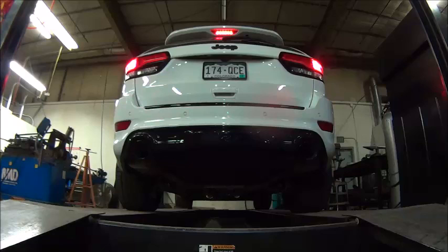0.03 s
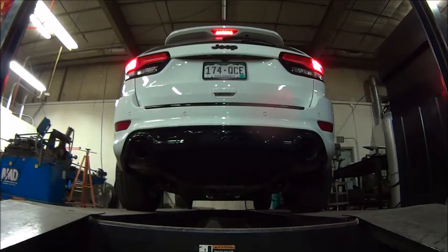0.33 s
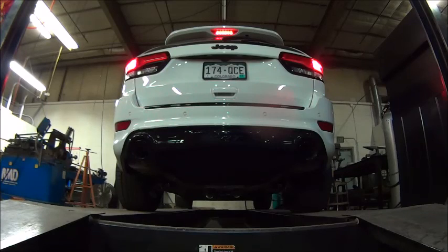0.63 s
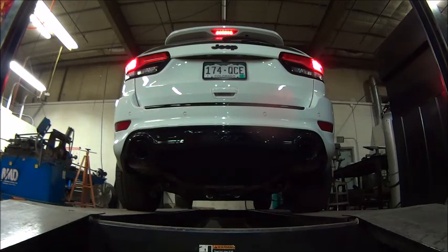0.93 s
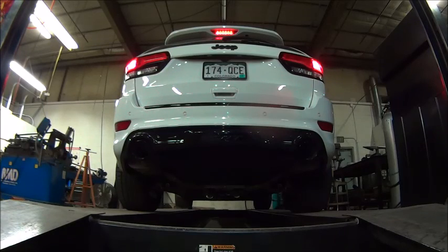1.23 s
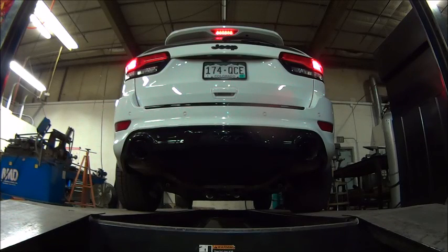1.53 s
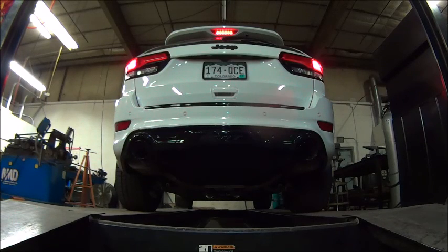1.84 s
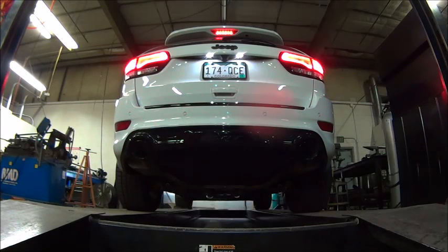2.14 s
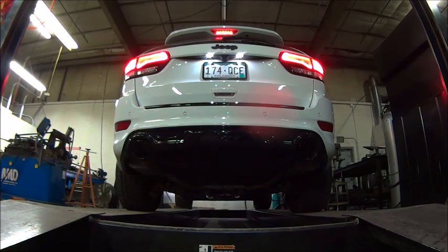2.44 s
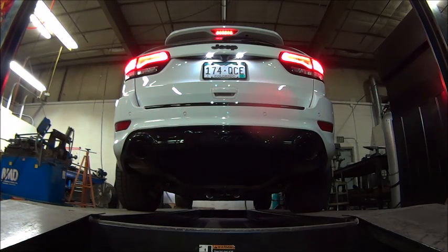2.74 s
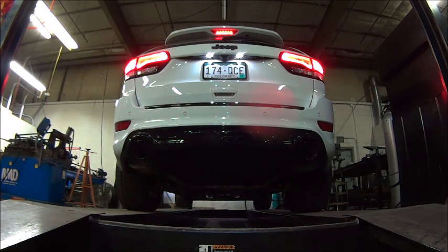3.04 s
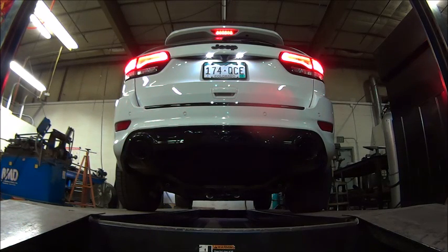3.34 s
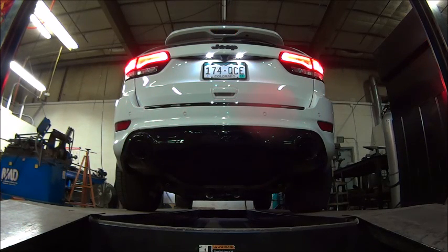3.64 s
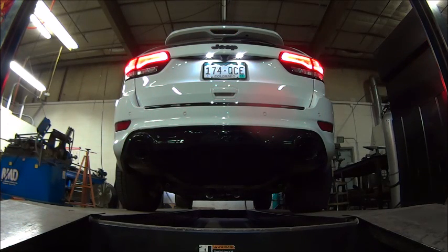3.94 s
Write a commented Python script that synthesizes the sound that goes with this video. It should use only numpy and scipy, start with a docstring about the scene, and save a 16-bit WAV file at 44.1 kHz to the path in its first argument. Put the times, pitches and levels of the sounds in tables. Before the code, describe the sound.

A car's starter grinds briefly, then the big engine fires and throbs through its exhaust.

```python
"""A V8 starts in a workshop, heard on a stereo microphone just behind its tailpipes.
First a faint whine sinks, the fuel pump hisses and a relay clacks. The starter's gear teeth grind and
squeal through a few compressions, each chuffing air from the pipes. The engine catches, flares, booms
at a fast idle and settles into a loping rumble as its unequal cylinders pulse through the exhaust.
The walls add a short tail, and the shop's machines murmur in the background."""
import sys
import numpy as np
from scipy import signal
from scipy.fft import rfft, irfft, next_fast_len
from scipy.io import wavfile
from scipy.ndimage import uniform_filter1d, minimum_filter1d, map_coordinates

SR = 44100
rng = np.random.default_rng(int(sys.argv[2]) if len(sys.argv) > 2 else 0)


def master(y):
    """Save y as 16-bit WAV."""
    cut = np.clip(np.atleast_2d(y).T, -1, 1)
    pcm = np.round(cut * 32767)  # scale
    wavfile.write(sys.argv[1], SR, pcm.astype(np.int16))


N = 176400

# engine speed (time [s], firing rate [Hz])
FIRING_RATE = [(1.79, 48.46), (1.83, 60.6), (1.87, 74.7), (1.92, 93.9), (1.97, 109), (2.03, 127.4),
               (2.1, 123.4), (2.18, 115.9), (2.29, 112.4), (2.45, 102), (2.55, 102.6), (2.7, 106.4),
               (2.87, 104.7), (3.05, 99.7), (3.25, 96.84), (3.5, 94.35), (4.0, 93)]
# cylinders in firing order; two stand out and make the throb (bank [0 or 1], strength [dB])
CYLINDERS = [(0, -3), (1, 10), (1, -2), (0, -6), (1, 8), (0, -1), (0, -5), (1, -6)]
# exhaust pulses (time [s], relative level [dB])
PULSE_LEVEL = [(1.78, -19.5), (1.86, -10), (2.0, -15.5), (2.17, -17), (2.3, -21), (2.8, -25), (3.3, -22.5),
               (4.0, -22)]
# resonances of the exhaust pipes (frequency [Hz], gain [dB])
PIPE_COLOUR = [(30, -36), (60, 4), (100, -15), (160, 5.5), (220, -4.5), (330, -5), (415, -10), (520, -18.5),
               (680, -23), (900, -33.5), (1600, -73)]
# boom at the firing rate (time [s], level [dB])
BOOM_LEVEL = [(1.775, -70), (1.797, -17), (1.87, -15), (1.96, -5.5), (2.05, -11.5), (2.14, -17),
              (2.22, -16), (2.26, -11), (2.42, -10.5), (2.6, -8.5), (2.95, -10.5), (3.15, -13),
              (3.4, -17.5), (3.7, -23), (4.0, -35)]
# lope from unequal cylinders (time [s], gain [dB])
LOPE_GAIN = [(1.78, -50), (1.85, -24), (2.2, -11), (2.45, -7), (2.75, -14.5), (3.0, -10.5), (3.25, -3.5),
             (3.55, 0), (4.0, 0)]
# strong lines of the lope (order [multiple of the engine cycle], relative level [dB])
LOPE_ORDERS = [(6, -32), (7, -37), (9, -18.5), (10, -21), (11, -44.5), (14, -27), (16, -19), (24, -30),
               (26, -39), (32, -39.5), (40, -41.5)]
# strong lines of the open-throttle bark (order [multiple of the engine cycle], level [dB])
BARK_ORDERS = [(5, -22), (16, -23), (17, -28), (20, -24), (21, -22.5), (22, -31.5), (24, -36), (29, -30.5),
               (33, -47), (40, -42), (42, -29)]
# ragged combustion (time [s], level [dB])
RAGGED_LEVEL = [(1.775, -66), (1.8, -30), (1.87, -10), (2.0, -13), (2.2, -20.5), (2.3, -32.5), (2.7, -32),
                (4.0, -32.5)]
# spectrum of ragged combustion (frequency [Hz], gain [dB])
RAGGED_COLOUR = [(20, -24), (70, 11), (165, -8), (325, 3), (510, -10.5), (650, -10.5), (900, -26.5),
                 (1500, -34)]
# gas hiss at the tailpipes (time [s], level [dB])
GAS_LEVEL = [(1.82, -15.5), (1.9, -25), (1.97, -25), (2.01, -29), (2.16, -30), (2.28, -35.5), (2.42, -34.5),
             (2.8, -41.5), (3.2, -41), (4.0, -41)]
# spectrum of the gas hiss (frequency [Hz], gain [dB])
GAS_COLOUR = [(470, -10), (800, -0.5), (1300, -5), (1650, -1), (2500, -3), (3050, -2.5), (4500, -8),
              (7700, -7.5), (9000, -11), (11000, -14)]
# how far the hiss comes in puffs (time [s], depth [0 to 1])
PUFF_DEPTH = [(1.82, 0.71), (1.9, 0.67), (1.97, 0.22), (2.4, 0.16)]
# upper treble of the gas hiss (time [s], level [dB])
FINE_HISS_LEVEL = [(2.9, -54), (3.3, -42), (4.0, -36.5)]
# spectrum of that treble and of the noise in the gear slap (frequency [Hz], gain [dB])
FINE_COLOUR = [(3000, -9), (5000, -4), (7700, 1), (9000, -7), (11000, -7.5)]
# compressions that load the starter (time [s], length [s], strength [dB], gear slap level [dB])
COMPRESSIONS = [(1.093, 0.12, -3, -15.5), (1.238, 0.11, -2.5, -45), (1.389, 0.079, -1, -28),
                (1.508, 0.066, 1, -23), (1.617, .058, -2.5, -21), (1.707, .048, -0.5, -21),
                (1.781, 0.023, -8.5, -21)]
# resonances of the starter housing (frequency [Hz], gain [dB])
HOUSING_COLOUR = [(150, -28), (270, 2), (350, -6.5), (420, -3.5), (600, -1.5), (740, 6.5), (1020, -1),
                  (1390, -2.5), (1650, 2.5), (2200, -3.5), (3000, -3), (6000, -63)]
# rasp of the gear teeth (frequency [Hz], gain [dB])
RASP_COLOUR = [(1100, -33), (2000, -4), (3000, -3.5), (5100, -1), (7700, -7), (8300, -11), (11000, -15.5)]
# thud of the pinion striking the starter housing (frequency [Hz], gain [dB])
THUD_COLOUR = [(170, -40), (430, -7), (1300, -35)]
# starter and flywheel modes (frequency [Hz], relative level [dB], time of the swell [s])
FLYWHEEL_MODES = [(398, -42, 1.13), (544, -34, 1.6), (764, -39, 1.7), (1012, -32, 1.3), (1556, -37, 1.66),
                  (2116, -38, 1.56), (3548, -42, 1.2), (3996, -39, 1.33), (4231, -40, 1.46)]
# unfired air leaving the pipes (time [s], relative level [dB])
CHUFFS = [(1.127, -28.5), (1.25, -37), (1.375, -30), (1.5, -36), (1.661, -30.5)]
# spectrum of a chuff (frequency [Hz], gain [dB])
CHUFF_COLOUR = [(20, -16), (54, 2.5), (170, -14), (275, -11), (390, -27), (660, -120)]
# gear squeal, sinking under each compression (time [s], pitch [Hz], level [dB])
SQUEAL = [(1.12, 1830, -36), (1.19, 1650, -29.5), (1.225, 1750, -45), (1.255, 2160, -30),
          (1.305, 1690, -29.5), (1.38, 1590, -36), (1.41, 2200, -28), (1.48, 1970, -47), (1.53, 2230, -25),
          (1.61, 2040, -46)]
# loose metal under the car (time [s], pitch [Hz], level [dB])
RATTLES = [(2.374, 3782, -34)]
# sinking whine (time [s], pitch [Hz], level [dB])
WHINE = [(.07, 6800, -59), (.22, 6730, -60), (.32, 6470, -60), (.42, 5870, -62), (.5, 5450, -80)]
# fuel pump hiss (time [s], level [dB])
PUMP_LEVEL = [(.52, -52), (.55, -41), (.59, -41.5), (.62, -48.5), (.66, -39.5), (.72, -39.5), (.76, -43.5),
              (.85, -36.5), (1.1, -39), (1.2, -76)]
# spectrum of the fuel pump (frequency [Hz], gain [dB])
PUMP_COLOUR = [(500, -17), (1400, -15), (1730, -2.5), (2100, -11.5), (2800, -7.5), (3300, -2), (4600, -5),
               (5400, -8), (6600, -8.5), (7400, -5.5), (8300, -15), (10800, -7.5)]
# resonances of the relay (frequency [Hz], gain [dB])
RELAY_COLOUR = [(500, -33), (1250, -32), (1740, -13), (2340, -1.5), (2750, -22), (3850, -10), (5050, -23),
                (5800, -14), (6500, -27), (8500, -14.5), (9100, -27), (10000, -11), (11000, -26)]
# partials of the throttle motor (frequency [Hz], level [dB])
THROTTLE_PARTIALS = [(999, -58), (1998, -50.5)]
# murmur of the workshop's machines (frequency [Hz], gain [dB])
SHOP_COLOUR = [(25, -15), (90, -1.5), (235, -4), (330, -13.5), (600, -18.5), (1400, -24.5), (5000, -48),
               (7000, -21), (11000, -28.5)]
# reverberation of the workshop (frequency [Hz], time to fall 60 dB [s])
ROOM_T60 = [(100, 0.43), (1000, 0.26), (10000, 0.049)]
# likeness of noise on the left and right (frequency [Hz], correlation [0 to 1])
STEREO_LIKENESS = [(60, 1), (200, 1), (500, 0.76), (10000, 0.76)]
# imbalance of the microphone ports (frequency [Hz], left minus right [dB])
MIC_BALANCE = [(60, -3.5), (110, -1.5), (300, -2), (550, 1.5), (1100, -0.5), (2000, -1), (4000, -3),
               (10000, -1.5)]
# phase between the microphone ports (frequency [Hz], left lead [rad])
MIC_PHASE = [(25, 1), (100, -0.87), (260, -0.93), (800, -1.14), (2500, -0.72), (6000, -0.017)]


def exhaust():
    """The V8 at the tailpipes, close up: firing pulses over boom, lope, bark, ragged burning and gas."""
    running = clock() > FIRING_RATE[0][0] - .02
    firing_hz = curve(FIRING_RATE) * (1 + 0.0038 * wobble(14)) * running
    firings = 2 + np.cumsum(firing_hz) / SR  # catches two places into the firing order
    pulses = firing_pulses(firings)
    boom = 2 ** .5 * np.sin(2 * np.pi * firings) * amp(curve(BOOM_LEVEL) + 1.2 * wobble(26.16))
    lope = engine_orders(firings, LOPE_ORDERS) * amp(curve(LOPE_GAIN))
    throttle = ramp(1.82, 0.03) * (1 - ramp(2.07, 0.21))
    bark = engine_orders(firings, BARK_ORDERS) * throttle
    ragged = noise(RAGGED_COLOUR) * amp(curve(RAGGED_LEVEL))
    rumble = (boom + lope + bark + ragged) * ramp(1.77, .01)
    return rumble + gas_hiss(firings) + room(pulses, wet_db=-8.5)


def firing_pulses(firings, bank_lag_s=0.0019, jitter_s=.0001, scatter_db=1.1):
    """Each firing kicks the pipes into resonance; one bank arrives a little late."""
    times = beats(firings)
    bank, strength_db = np.array(CYLINDERS)[np.arange(len(times)) % len(CYLINDERS)].T
    jitter, scatter = rng.standard_normal((1024, 2))[:len(times)].T
    arrivals = times + bank * bank_lag_s + jitter_s * jitter
    kicks = train(arrivals, amp(strength_db + scatter_db * scatter) * (times > 0))
    return unit(body(kicks, PIPE_COLOUR)) * amp(curve(PULSE_LEVEL) - 3.5)


def engine_orders(firings, orders, smear_rad=1.19):
    """Wavering tones at multiples of the engine cycle, their phases smeared over the cycle."""
    cycle_phase = 2 * np.pi * firings / len(CYLINDERS)
    return sum(amp(db + 1.3 * wobble(11)) * 2 ** .5 * np.sin(k * cycle_phase + smear_rad * k ** 2)
               for k, db in orders)


def gas_hiss(firings, lag_firings=0.52):
    """Gas leaves the pipes in a puff after each firing, under a fine hiss that grows at idle."""
    depth = curve(PUFF_DEPTH)
    puffs = (1 + depth * np.cos(2 * np.pi * (firings - lag_firings))) / np.sqrt(1 + depth ** 2 / 2)
    gas = noise(GAS_COLOUR) * puffs * amp(curve(GAS_LEVEL) + 0.77 * wobble(30.16))
    fine_hiss = noise(FINE_COLOUR) * amp(curve(FINE_HISS_LEVEL))
    return (gas + fine_hiss) * ramp(1.8, 0.055)


def starter(housing_lag_s=.014, coast_db=-2, rasp_coast_db=-9):
    """The pinion thuds in; its teeth grind on housing and flywheel, harder at each compression."""
    teeth = gear_teeth(load_lag_s=2 * housing_lag_s)
    housing = unit(room(unit(body(teeth, HOUSING_COLOUR)), wet_db=-4.5) + amp(5) * noise(HOUSING_COLOUR))
    rasp = unit(room(unit(body(teeth, RASP_COLOUR)), wet_db=-3) + amp(1.5) * noise(RASP_COLOUR))
    metal = amp(-21) * housing + amp(1) * flywheel()
    # the coast levels keep the grind going between compressions
    grind = metal * np.hypot(amp(coast_db), compression_load(housing_lag_s))
    grind += amp(-19) * rasp * np.hypot(amp(rasp_coast_db), compression_load(0))
    slap_envelope = sum(amp(db) * burst(s, attack=.005, t60=0.25) for s, _, _, db in COMPRESSIONS)
    slaps = unit(noise(FINE_COLOUR) + .5 * rasp) * slap_envelope
    thud = noise(THUD_COLOUR) * amp(-25) * burst(COMPRESSIONS[0][0], attack=.005, t60=0.51)
    engaged = ramp(1.088, 0.0086) * (1 - ramp(1.812, 0.013))
    return (grind + slaps + thud) * engaged


def gear_teeth(load_lag_s, mesh_hz=503.6, climb_hz_per_s=110, sag_hz=74):
    """One uneven strike per tooth; the rate climbs as the starter spins up and sags under load."""
    drag = uniform_filter1d(compression_load(load_lag_s), size=3000)
    tooth_hz = mesh_hz + climb_hz_per_s * (clock() - COMPRESSIONS[0][0]) - sag_hz * drag
    times = beats(np.cumsum(tooth_hz * (1 + .02 * wobble(60))) / SR)
    jitter, scatter = rng.standard_normal((8192, 2))[:len(times)].T
    return train(times + .00006 * jitter, amp(2 * scatter))


def compression_load(lag_s, rise_s=.009, fall_s=0.0456):
    """The effort of the starter: each compression rises, holds and lets go."""
    return sum(amp(db) * ramp(s + lag_s, rise_s) * (1 - ramp(s + lag_s + length - fall_s / 2, fall_s))
               for s, length, db, _ in COMPRESSIONS)


def flywheel(width_hz=22, swell_db=8, swell_s=0.14):
    """Narrow metal modes that ring under the gear teeth and swell one after another."""
    ringing = np.zeros(N)
    for hz, db, peak_s in FLYWHEEL_MODES:
        swell = np.exp(-.5 * ((clock() - peak_s) / swell_s) ** 2) - .5
        flutter = 1 + .5 * wobble(width_hz) + .5j * wobble(width_hz)
        phase = 2 * np.pi * np.cumsum(hz + width_hz / 2 * wobble(2 * width_hz)) / SR
        ringing += amp(db + swell_db * swell) * np.real(flutter * np.exp(1j * phase))
    return ringing


def chuffs():
    """Cranking pushes unfired air out of the pipes, right by the microphone."""
    envelope = sum(amp(db) * burst(s, attack=0.017, t60=0.68) for s, db in CHUFFS)
    return amp(1.5) * noise(CHUFF_COLOUR) * envelope


def gear_squeal(lower_octave_db=-1):
    """The starter's gears sing and sink as each compression drags them down."""
    phase = 2 * np.pi * np.cumsum(curve(SQUEAL) * (1 + 0.008 * wobble(220))) / SR
    tone = np.sin(phase) + amp(lower_octave_db) * np.sin(phase / 2)
    level = amp(curve(SQUEAL, column=2) + 2.3 * wobble(55.9))
    gate = ramp(SQUEAL[0][0], .02) * (1 - ramp(SQUEAL[-1][0], .02))
    return room(tone * level * gate, wet_db=-3)


def rattle():
    """Loose metal under the car rings briefly as the engine shakes it."""
    ringing = np.zeros(N)
    for s, hz, db in RATTLES:
        flutter = wobble(350) + 1j * wobble(350)
        ring = np.real(flutter * np.exp(2j * np.pi * hz * clock()))
        ringing += amp(db) * ring * burst(s, attack=0.0034, t60=0.071)
    return ringing


def whine():
    """A faint, high whine sinks before the pump runs."""
    phase = 2 * np.pi * np.cumsum(curve(WHINE) * (1 + 0.003 * wobble(500))) / SR
    return unit(np.sin(phase)) * amp(curve(WHINE, column=2))


def fuel_pump():
    """The pump primes the engine with an unsteady hiss."""
    return noise(PUMP_COLOUR) * amp(curve(PUMP_LEVEL) + 1.1 * wobble(91.1))


def relay():
    """A relay closes with one bright clack that carries into the room."""
    clack = noise(RELAY_COLOUR) * amp(-17.5) * burst(.802, attack=0.0054, t60=0.12)
    return room(clack, wet_db=-7)


def clunk():
    """A soft metallic clunk, well before cranking."""
    metal = noise(HOUSING_COLOUR) + amp(-4.5) * noise(RASP_COLOUR)
    return metal * amp(-49.5) * burst(0.169, attack=0.0062, t60=0.82)


def throttle_motor():
    """The throttle motor buzzes on two partials between the relay and the starter."""
    buzz = sum(amp(db) * unit(np.sin(2 * np.pi * hz * clock())) for hz, db in THROTTLE_PARTIALS)
    return buzz * ramp(0.814, .04) * (1 - ramp(1.08, .03))


def workshop():
    """Room tone: the steady murmur of the shop's machines."""
    return amp(-47.5) * noise(SHOP_COLOUR)


def room(x, wet_db):
    """Adds the tail from the workshop's walls, different on each side of the microphone."""
    hz, t, spectrum = signal.stft(rng.standard_normal((2, SR // 2)), SR, nperseg=256)
    decay = amp(-60 * t / along(ROOM_T60, hz)[:, None])
    tail = signal.istft(spectrum * decay, SR, nperseg=256)[1]
    wet = signal.fftconvolve(np.atleast_2d(x), tail / np.linalg.norm(tail[0]), axes=1)[:, :N]
    return x + amp(wet_db) * wet


def amp(db):
    """Decibels to gain."""
    return 10 ** (np.asarray(db) / 20)


def unit(x):
    """Scaled to rms 1."""
    return x / np.sqrt(np.mean(x ** 2) + 1e-20)


def along(points, hz):
    """Interpolates (frequency [Hz], value) points on a log axis."""
    knots_hz, values = np.transpose(points)
    return np.interp(np.log(hz + 1), np.log(knots_hz + 1), values)


def clock():
    """The time of each sample in seconds."""
    return np.arange(N) / SR


def curve(rows, column=1):
    """One column of a time table, per sample."""
    rows = np.array(rows)
    return np.interp(clock(), rows[:, 0], rows[:, column])


def ramp(start, length):
    """Rises from 0 to 1."""
    return np.clip((clock() - start) / length, 0, 1)


def burst(start, attack, t60):
    """A quick rise and an exponential fall."""
    return ramp(start, attack) * 1000 ** (-np.maximum(clock() - start, 0) / t60)


def wobble(rate):
    """A smooth random curve, rate knots a second."""
    return map_coordinates(rng.standard_normal(4096), [clock() * rate], mode="wrap")


def beats(count):
    """Times at which a running count passes whole numbers."""
    return np.interp(np.arange(1, int(count[-1])), count, clock())


def train(times, sizes):
    """Impulses placed between samples."""
    at = np.clip(times * SR, 0, N - 2)
    i = at.astype(int)
    return np.bincount(i, sizes * (1 - at + i), N) + np.bincount(i + 1, sizes * (at - i), N)


def filtered(x, response):
    """x through a complex response of frequency."""
    size = 2 * next_fast_len(N * 3 // 4)
    return irfft(rfft(x, size) * response(np.fft.rfftfreq(size, 1 / SR)), size)[..., :N]


def body(x, colour):
    """x through a causal filter of the given colour."""
    def minimum_phase(hz):
        cepstrum = irfft(np.log(amp(along(colour, hz))))
        half = len(cepstrum) // 2
        cepstrum[1:half] *= 2
        cepstrum[half + 1:] = 0
        return np.exp(rfft(cepstrum))
    return filtered(x, minimum_phase)


def noise(colour):
    """Coloured stereo noise of rms 1."""
    def mid_side(hz):
        width = np.arccos(np.clip(along(STEREO_LIKENESS, hz), -1, 1)) / 2
        return amp(along(colour, hz)) * [np.cos(width), np.sin(width)]
    mid, side = filtered(rng.standard_normal((2, N)), mid_side)
    return unit(np.array([mid + side, mid - side]))


def limiter(x, ceiling=0.56, hold_s=0.0041):
    """Turns both channels down briefly where a peak would pass the ceiling."""
    hold = int(hold_s * SR) + 1
    gain = ceiling / np.maximum(np.abs(x).max(axis=0), ceiling)
    return x * uniform_filter1d(minimum_filter1d(gain, hold), hold)


def scene():
    """The car from just behind its tailpipes, with the workshop in the background."""
    engine = exhaust() + starter() + chuffs() + gear_squeal() + rattle()
    priming = whine() + fuel_pump() + relay() + clunk() + throttle_motor()
    return engine + priming + workshop()


def record(dry):
    """A stereo microphone with two unequal ports, limited, switched on a moment in, top treble cut."""
    switch_on_s, top_hz = 0.07, 11120

    def ports(hz):
        left = amp(along(MIC_BALANCE, hz)) ** .5 * np.exp(.5j * along(MIC_PHASE, hz))
        return np.array([left, 1 / left])
    picked_up = limiter(filtered(dry, ports)) * ramp(switch_on_s, 0.0018)
    return filtered(picked_up, lambda hz: hz < top_hz)


dry = scene()
out = record(dry)
master(out)
```